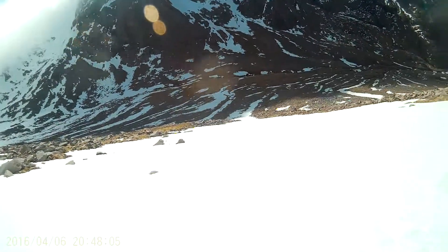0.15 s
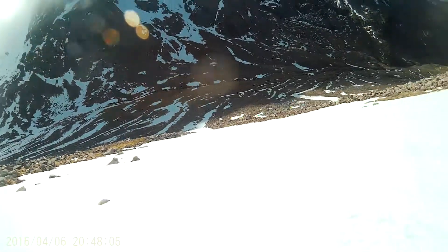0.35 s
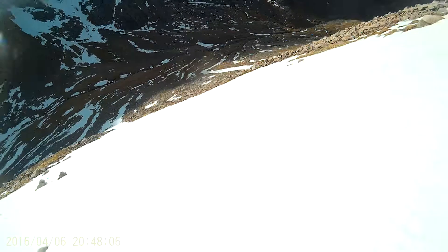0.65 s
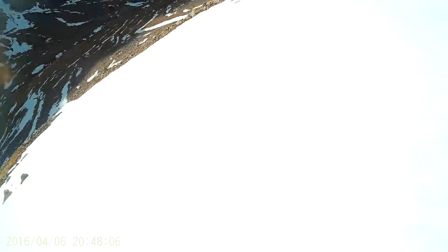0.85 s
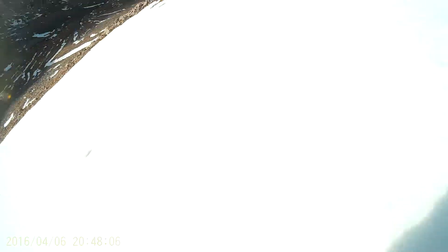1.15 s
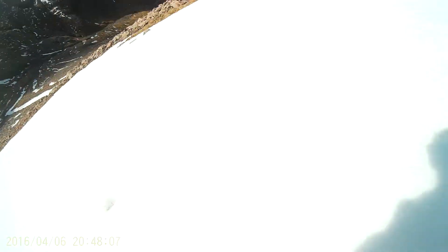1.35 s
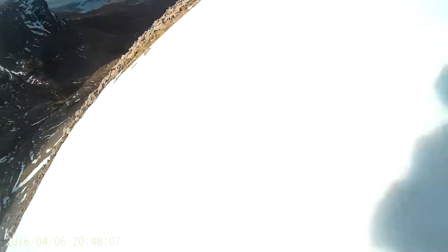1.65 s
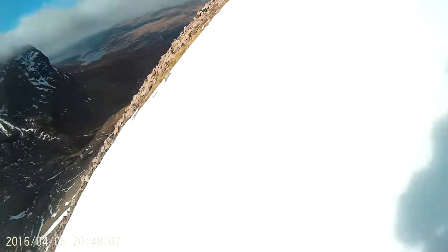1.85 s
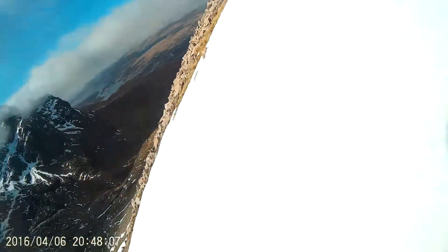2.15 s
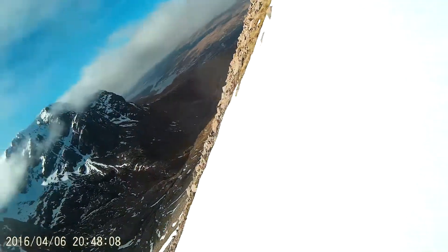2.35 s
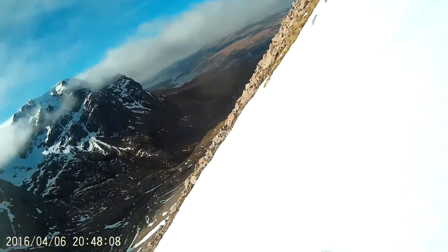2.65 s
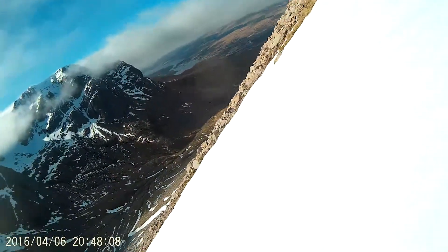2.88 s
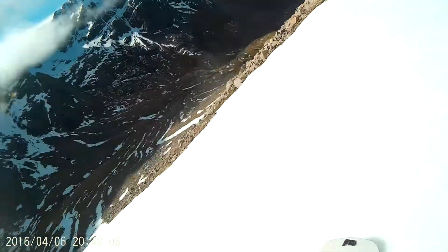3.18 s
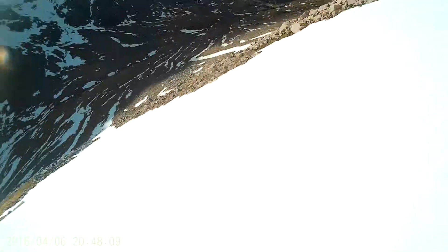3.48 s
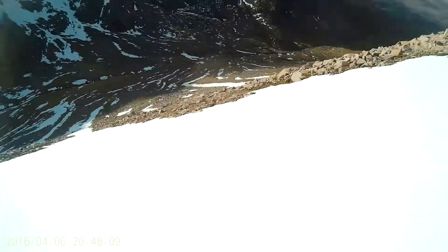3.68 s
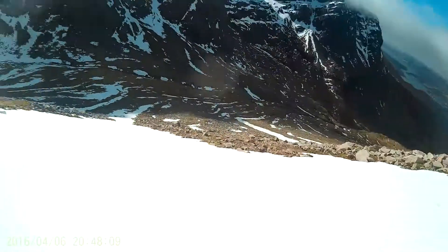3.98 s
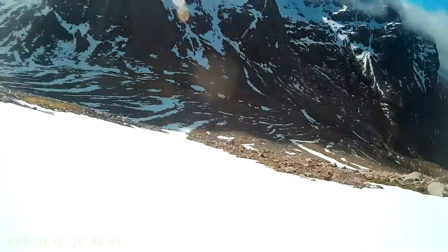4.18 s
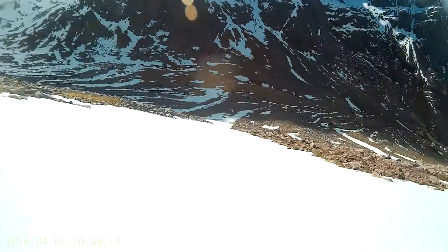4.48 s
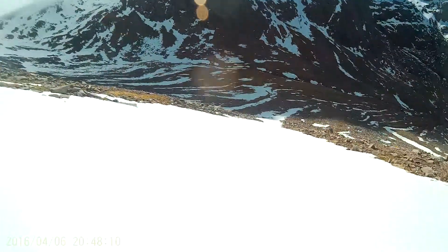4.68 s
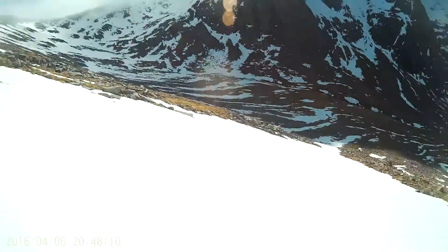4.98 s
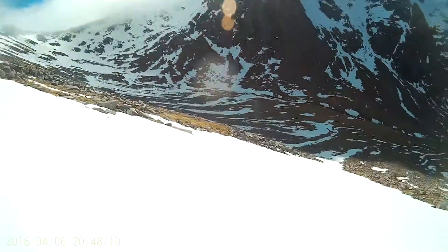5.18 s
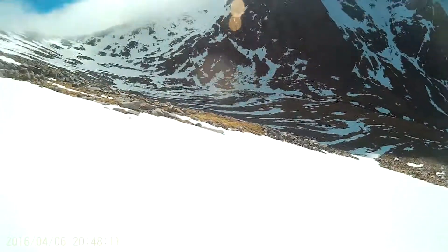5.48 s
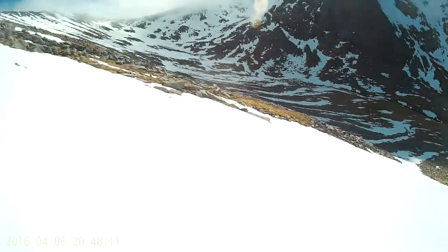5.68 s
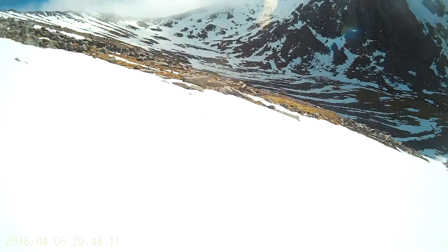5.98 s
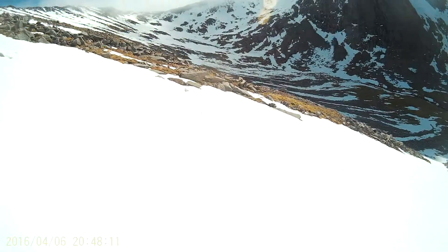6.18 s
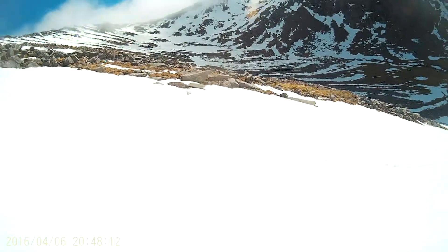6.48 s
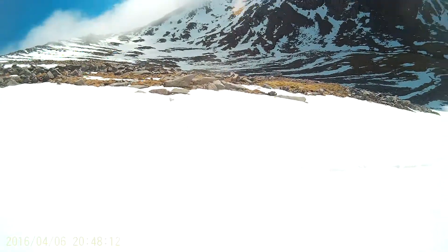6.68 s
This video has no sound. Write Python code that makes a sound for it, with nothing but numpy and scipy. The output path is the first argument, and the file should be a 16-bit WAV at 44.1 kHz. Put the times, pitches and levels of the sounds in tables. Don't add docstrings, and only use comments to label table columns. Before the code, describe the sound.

Close, gritty hiss of a snowboard edge on coarse snow, heard through a small plastic-cased camera. It surges, lifts to near silence, returns as steady scraping with low wind buffets, and a short airy whistle rises. After a second drop-out it comes back loudest, crunching through ice lumps, then continues in uneven scrapes. Dry open mountainside, mono, faint hiss beneath.

```python
import sys
import numpy as np
from scipy import signal
from scipy.fft import rfft, irfft
from scipy.io import wavfile
from scipy.ndimage import uniform_filter1d

SR = 44100
rng = np.random.default_rng(int(sys.argv[2]) if len(sys.argv) > 2 else 0)


def materialize(psi):
    bounded = np.clip(np.atleast_2d(psi).T, -1, 1)
    quanta = np.round(bounded * 32767).astype(np.int16)
    wavfile.write(sys.argv[1], SR, quanta)


def volts_from_db(level):
    exponent = np.asarray(level, float) / 20
    return 10 ** exponent


N = 301644


def slide():
    # t/s, turned across the slope 0-1, tipped down 0-1
    facing = [(0, 0.8, 0.7), (.3, 0, 0.4), (.6, 0., 0.13), (1., 0.04, 0.15), (1.5, 0.73, 0.),
              (2.1, 0.8, 0.3), (2.4, 0.93, 0.8), (2.9, 0.85, 0.67), (3.3, 0.84, 0.87), (3.8, 0.6, 0.4),
              (4.4, 0., 0.13), (5.2, 0.36, 0.37), (6., 0.5, 0.45), (6.84, 0.34, 0.57)]
    # f/Hz, width/Hz, level when turned/dB, level when tipped/dB
    shade = [(1050, 300, -4, 3.5), (1580, 550, -1.5, -1.5), (1980, 330, 3, -5), (3070, 690, 1, 4),
             (4000, 680, -4.5, 4), (4770, 160, 5, -9.5), (5600, 550, -3.5, 4.5), (6300, 940, 5.5, -6.5),
             (7500, 490, 8.5, -7), (8600, 900, 2.5, -6.5), (10600, 1000, -4.5, -0.5), (11960, 550, 1, 2.5),
             (13200, 900, 2, 1), (14800, 900, 2, 10)]
    grains = crystals(per_s=5000, spread_db=2.0, wash=0.64)
    hz, t, z = signal.stft(grains, SR, nperseg=256, noverlap=192)
    pressure_db, thrum_db, powder = edge(t)
    turned, tipped = np.clip(curves(facing, t), 0, 1)
    ease_db = pressure_db + 38.0

    octave = np.log2(hz[:, None] + 1)
    low = 1 / (1 + np.exp((octave - np.log2(700)) * 4))
    upper = np.exp(-.5 * ((octave - np.log2(3400)) / .5) ** 2)
    high = 1 / (1 + np.exp((np.log2(5300) - octave) * 5))
    bite_db = -3 + 8 * powder
    spray_db = -3.5 + 10 * powder
    level_db = pressure_db + upper * bite_db
    level_db = level_db + low * (thrum_db - 0.26 * ease_db)
    level_db = level_db + high * (spray_db - 0.48 * ease_db)
    for f, width, turned_db, tipped_db in shade:
        level_db = level_db + bell(hz, f, width)[:, None] * (turned_db * turned + tipped_db * tipped)
    level_db = level_db - 0.076 * ease_db * bell(hz, 3700, 1500)[:, None]

    raw = rng.standard_normal((len(t), len(hz))).T
    patches = evened(uniform_filter1d(uniform_filter1d(raw, size=4, axis=0), size=40, axis=1))
    chatter = evened(uniform_filter1d(rng.standard_normal(len(t)), size=12))
    clumps = evened(uniform_filter1d(rng.standard_normal(len(t)), size=5))
    clumps = clumps * np.clip(ease_db / 8 + 0.45, 0, 1)
    middle = 1 - .5 * high - .5 * low
    level_db = level_db + 1.23 * patches + (0.31 * chatter + 0.72 * clumps) * middle
    return signal.istft(z * volts_from_db(level_db), SR, nperseg=256, noverlap=192)[1][:N]


def crystals(per_s, spread_db, wash):
    size, sign = rng.exponential(1, N), rng.choice([-1., 1.], N)
    struck = rng.random(N) < per_s / SR
    clicks = sign * volts_from_db(spread_db * np.minimum(size, 4)) * struck
    powder = rng.standard_normal(N)
    wash = np.clip(wash, 0, 1)
    return np.sqrt(1 - wash) * evened(clicks) + np.sqrt(wash) * powder


def edge(t):
    # t/s, edge pressure level/dB, loose powder thrown up 0-1, base laid flat 0-1
    weight = [(0, -37, 0.42, 0.1), (.52, -43, 0.25, 0.17), (.65, -56, 1, .6), (.84, -58.5, 0.86, .6),
              (.95, -52.5, .4, 0.54), (1.41, -45, 0, .6), (1.58, -40.5, 0.37, 0.5), (2.05, -40, .6, 0.41),
              (3.12, -38.5, 0.25, 0.53), (3.27, -51, 0.45, 0.9), (3.62, -57, 0, .9), (3.76, -46, 0.1, 0.84),
              (4.07, -31.5, 0.37, 0.8), (4.52, -33, 0.52, 0.65), (4.7, -39.5, 0.62, 0.77),
              (5.6, -39.5, 0.55, 0.78), (5.9, -38, 0.29, 0), (6.84, -39.5, 0.28, 0.43)]
    # start t/s, length/s, change of pressure level/dB, thump of the base level/dB
    ridges = [(0.128, 0.14, -2, 0), (0.216, 0.36, 9.5, 2), (0.533, 0.13, 5, 1), (1.517, 0.1, 2, 2),
              (1.66, 0.17, 3.5, 5), (1.864, 0.24, 2.5, 2.5), (2.212, 0.29, -2, 2), (3.369, 0.18, -9, -4),
              (3.516, 0.067, -14, -2), (3.84, .1, 0.5, -4), (3.92, 0.22, -2.5, -1), (4.27, 0.093, 6, -5),
              (4.378, .08, 2, 0), (4.446, .07, -2.5, -4), (4.708, 0.092, 8.5, -5), (4.815, 0.15, -3.5, -4),
              (4.917, 0.11, 6.5, -3.5), (5.043, 0.11, -5, -4), (5.095, 0.16, 9, 0.5),
              (5.327, 0.17, 7, -0.5), (5.607, 0.23, 3, 0.5), (5.79, 0.1, 2, 2), (5.837, 0.17, 3, 1),
              (6.088, 0.13, 2.5, 4), (6.36, 0.1, 0, 6), (6.495, 0.27, -3.5, -2)]
    weight_db, powder, flat = curves(weight, t)
    crossing = np.array([trapezoid(t, s, length, rise_s=0.043, fall_s=.08) for s, length, _, _ in ridges])
    load_db, thump_db = np.transpose(ridges)[2:] @ crossing
    thrum_db = -3.5 + 8.5 * np.clip(flat, 0, 1) + thump_db
    return weight_db + load_db, thrum_db, np.clip(powder, 0, 1)


def lumps():
    # t/s, peak level/dB, time to decay by 60 dB/s
    struck = [(0.24, -16.5, 0.041), (1.698, -23, 0.051), (1.771, -21, 0.096), (3.871, -24, 0.06),
              (4.049, -33, 0.055), (4.119, -17, 0.15), (4.319, -16, 0.066), (4.4, -13.5, 0.06),
              (4.959, -27, 0.07), (5.139, -19, 0.047), (5.276, -14, 0.049), (5.372, -17, 0.054),
              (5.624, -18, 0.093), (6.755, -29, 0.095), (4.066, -16.5, 0.1), (4.235, -16, .06),
              (4.288, -22, 0.037), (4.342, -12, .04), (4.508, -20, 0.071), (4.715, -27, 0.036),
              (1.575, -27, 0.063), (1.49, -24, .06), (6.275, -24, .03), (6.6, -30, .03)]
    out, t = np.zeros(N), np.arange(3000) / SR
    for s, db, t60 in struck:
        burst = rng.standard_normal(len(t))
        attack = np.minimum(t / 0.00087, 1)
        add(out, s, volts_from_db(db - 12.5 - 60 * t / max(t60, .01)) * burst * attack)
    return signal.lfilter(*signal.butter(2, 4500, fs=SR), out)


def housing(x):
    # f/Hz, level/dB per Hz
    crush = [(35, -49), (60, -36), (132, -23), (386, -10.5), (629, -13), (1790, 0), (2600, -7),
             (4040, -11.5), (6140, -24.5), (11000, -31.5), (15600, -43)]
    # f/Hz, width/Hz, level/dB
    resonances = [(1087, 570, 5), (1400, 280, -2.), (1660, 380, 1.5), (1730, 360, 0), (1982, 52, -4),
                  (2286, 260, 4), (2633, 340, -4.5), (2950, 315, 4), (3530, 330, -3), (3970, 280, 1.5),
                  (4434, 190, -4), (4600, 94, 4), (5510, 1090, 3), (6200, 750, -3), (7120, 920, 4.5),
                  (7730, 380, -4.5), (7910, 280, 4.5), (8600, 330, 1.5), (9400, 400, -2.5),
                  (10900, 1340, 8), (11200, 300, 0), (12150, 500, 3.5), (13000, 800, 4.5)]
    hz = abs(np.fft.fftfreq(4096, 1 / SR))
    db = read(crush, hz) + sum(d * bell(hz, f, w) for f, w, d in resonances)
    log_gain = np.log(volts_from_db(np.maximum(db, -100)))
    response = np.fft.ifft(np.exp(np.conj(signal.hilbert(log_gain)))).real[:2048]
    return signal.oaconvolve(x, response / np.linalg.norm(response))[:N]


def rings():
    # t/s, length/s, f/Hz, level/dB
    ring_rows = [
        (.5, 0.17, 4130, -48),
        (0.58, 0.056, 2650, -44.5),
        (3.518, 0.02, 2290, -51),
        (3.6, .025, 4250, -59),
        (3.857, .06, 960, -38),
        (6.74, 0.045, 1800, -41),
        (5.72, 0.37, 1690, -37),
        (6.3, 0.057, 2250, -37),
        (4.95, .05, 2220, -34),
    ]
    # t/s, peak level/dB
    tap_rows = [
        (2.842, -48),
        (4.749, -38),
        (5.247, -35),
        (5.566, -45),
    ]
    out = np.zeros(N)
    for s, length, hz, db in ring_rows:
        t = np.arange(round(length * SR)) / SR
        tone = (fuzz(len(t), 240) * np.exp(2j * np.pi * hz * t)).real
        add(out, s, volts_from_db(db - 2.5) * tone * signal.windows.tukey(len(t), .8))
    t = np.arange(100) / SR
    band = signal.butter(2, [4200, 11000], "band", fs=SR, output="sos")
    for s, db in tap_rows:
        crack = rng.standard_normal(len(t)) * volts_from_db(-60 * t / 0.0043)
        tap = signal.sosfilt(band, crack)
        add(out, s, volts_from_db(db) * tap / abs(tap).max())
    return out


def wind():
    # middle t/s, length/s, push on the membrane level/dB, eddies level/dB
    gusts = [(0.015, 0.093, -52, -69), (.46, 1, -48.5, -77), (1.115, 0.17, -45, -63),
             (1.286, 0.16, -70, -57), (1.41, 0.11, -52, -59), (1.605, 0.23, -39.5, -59),
             (1.8, 0.39, -48, -57), (2.047, 0.38, -37.5, -58), (2.274, 0.17, -50, -57),
             (2.47, 0.46, -38, -64), (2.7, 0.22, -60, -65), (2.896, .15, -64, -59.5),
             (3.066, 0.39, -41.5, -78), (3.235, 0.15, -50, -64), (3.47, 0.087, -75, -59),
             (3.716, 0.22, -45.5, -73), (3.9, .2, -47, -60), (4.114, 0.41, -41.5, -61),
             (4.32, .1, -52, -65), (4.44, .12, -39, -63), (4.667, 0.11, -46, -61), (4.82, 0.36, -40, -69),
             (5.076, 0.34, -37.5, -65), (5.308, .25, -48, -61), (5.54, 0.3, -41, -69),
             (5.822, 0.25, -53, -67), (6.063, 0.18, -47, -76), (6.31, 0.4, -49, -79),
             (6.76, 0.22, -51, -83)]
    # f/Hz, level/dB
    buffet = [(2, -31), (5, 6.5), (10, 13), (15, -4), (21, -36), (32, -15), (80, -66)]
    flutter_colour = [(14, -23), (23, 4), (32, 16), (45, -2), (70, -25), (120, -60.)]
    roar = [(30, -35), (50, -1), (90, -9.5), (150, -11.), (300, -20.5), (600, -37)]
    t = np.arange(0, N / SR + .01, .005)
    swell = np.array([bell(t, s, length / 2) for s, length, _, _ in gusts])
    calm = volts_from_db(np.array([[-64], [-69]]))
    push, eddy = volts_from_db(np.transpose(gusts)[2:]) @ swell + calm
    flutter = volts_from_db(-60) * (push / volts_from_db(-49)) ** 0.28 * (eddy / volts_from_db(-56)) ** .3
    out = np.zeros(N)
    for size, colour in [(push, buffet), (flutter, flutter_colour), (eddy, roar)]:
        out += np.interp(np.arange(N) / SR, t, size) * steadied(coloured(colour), size=8000)
    return out


def whistle(width_hz, rough, slip_hz):
    # t/s, f/Hz
    pitch = [
        (2.53, 1630),
        (2.565, 1640),
        (2.6, 1710),
        (2.65, 1810),
        (2.69, 1850),
        (2.81, 1880),
    ]
    out, t = np.zeros(N), np.arange(2.5, 2.85, 1 / SR)
    unsteady = np.interp(t, [2.6, 2.68], [1, .35])
    slip = slip_hz * unsteady * fuzz(len(t), 61).real
    turns = np.cumsum(curves(pitch, t)[0] + slip) / SR
    wander = 1 + rough * fuzz(len(t), width_hz)
    add(out, t[0], np.sqrt(2) * puffs(t) * (wander * np.exp(2j * np.pi * turns)).real)
    return out


def puffs(t):
    # start t/s, length/s, level/dB
    blows = [
        (2.535, .036, -35),
        (2.584, .072, -35.5),
        (2.672, .052, -35.5),
        (2.727, .017, -29.5),
        (2.746, .028, -30.5),
        (2.777, .02, -33),
        (2.797, .013, -36),
    ]
    jitter, size = rng.standard_normal((40, 2)).T
    at = t[0] + (np.arange(len(size)) + 0.17 * jitter) / 70
    train = volts_from_db(2 * size) @ bell(t, at[:, None], .015 / 2)
    blowing = sum(volts_from_db(db) * trapezoid(t, s, length, rise_s=.012, fall_s=.005) for s, length, db in blows)
    steady_share = .3
    sharp_catch = volts_from_db(-31.5) * bell(t, 2.578, .007 / 2)
    return (steady_share + (1 - steady_share) * train) * blowing + sharp_catch


def circuit():
    # f/Hz, level/dB per Hz
    hiss = [(59, -8), (100, -8), (185, -5), (205, -5), (313, -9.5), (421, -13), (2230, -11.5),
            (2590, -18.5), (15600, -33)]
    # f/Hz, level/dB
    whine = [
        (6804, -74.),
        (13608, -89.),
    ]
    t = np.arange(N) / SR
    load_db = 0.23 * (uniform_filter1d(edge(t)[0], size=8000) + 36)
    lines = sum(volts_from_db(db + load_db) * np.sqrt(2) * np.sin(2 * np.pi * hz * t) for hz, db in whine)
    return volts_from_db(-55 - 7.0) * coloured(hiss) + lines


def evened(x):
    return x / np.sqrt(np.mean(x ** 2) + 1e-20)


def steadied(x, size):
    return x / np.sqrt(uniform_filter1d(x ** 2, size) + 0.17)


def read(points, hz):
    f, value = np.transpose(points)
    return np.interp(np.log(hz + 1), np.log(f + 1), value)


def curves(rows, t):
    s, *columns = np.transpose(rows)
    return [np.interp(t, s, c) for c in columns]


def coloured(points):
    hz = np.fft.rfftfreq(N, 1 / SR)
    return evened(irfft(rfft(rng.standard_normal(N)) * volts_from_db(read(points, hz)), N))


def fuzz(count, width_hz):
    r = np.exp(-np.pi * width_hz / SR)
    wander = rng.standard_normal(count + 2000) + 1j * rng.standard_normal(count + 2000)
    for _ in range(2):
        wander = signal.lfilter([1 - r], [1, -r], wander)
    wander = wander[-count:]
    return wander / np.sqrt(np.mean(abs(wander) ** 2))


def bell(x, centre, width):
    return np.exp(-.5 * ((x - centre) / (width / 2)) ** 2)


def trapezoid(t, start, length, rise_s, fall_s):
    return np.clip(np.minimum((t - start) / rise_s, (start + length - t) / fall_s), 0, 1)


def add(mix, s, sound):
    part = mix[round(s * SR):][:len(sound)]
    part += sound[:len(part)]


def scene():
    snow = housing(slide() + lumps())
    air = wind() + whistle(width_hz=280, rough=0.42, slip_hz=40)
    return (snow + air + rings() + circuit())[None]


def top_cut(x):
    return signal.sosfilt(signal.butter(12, 15730, fs=SR, output="sos"), x)


def record(dry):
    hz = np.fft.rfftfreq(N, 1 / SR)
    rolloff_db = -5.5 * np.clip((hz - 15050) / 600, 0, 1)
    mix = irfft(rfft(dry) * volts_from_db(rolloff_db), N)
    return top_cut(mix)


dry = scene()
out = record(dry)
materialize(out)
```